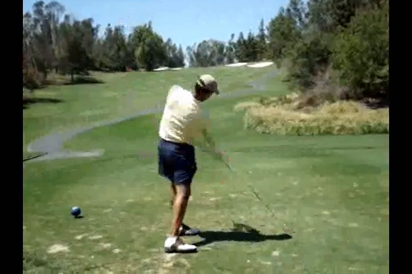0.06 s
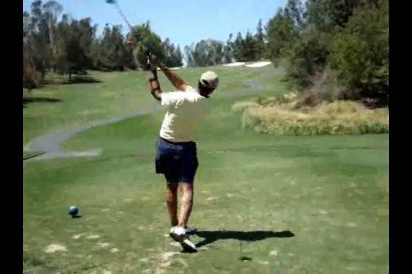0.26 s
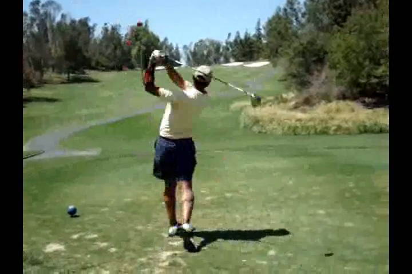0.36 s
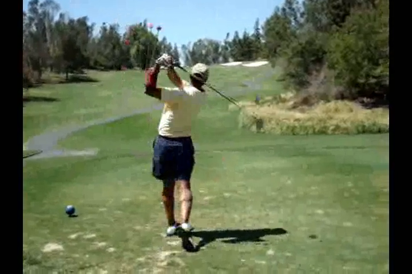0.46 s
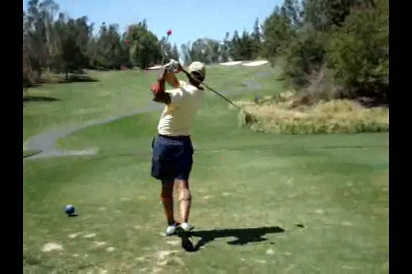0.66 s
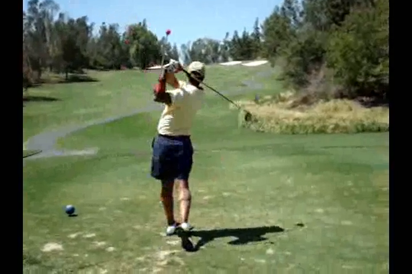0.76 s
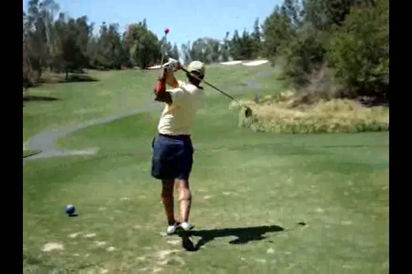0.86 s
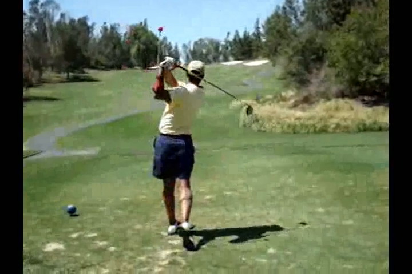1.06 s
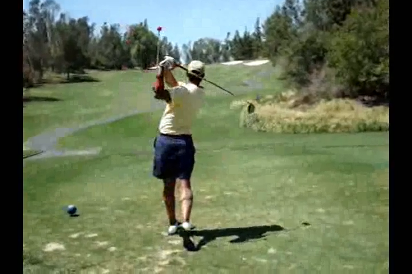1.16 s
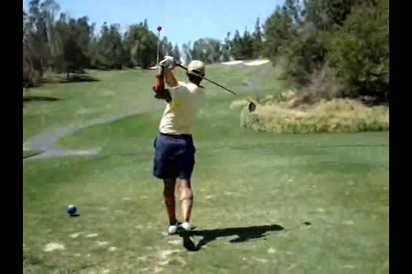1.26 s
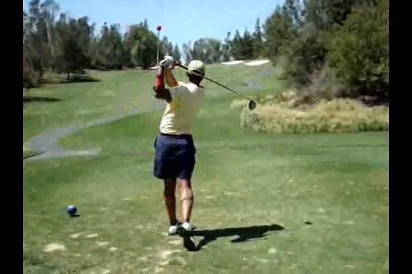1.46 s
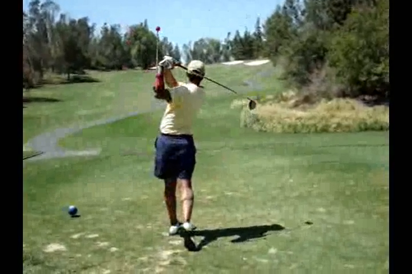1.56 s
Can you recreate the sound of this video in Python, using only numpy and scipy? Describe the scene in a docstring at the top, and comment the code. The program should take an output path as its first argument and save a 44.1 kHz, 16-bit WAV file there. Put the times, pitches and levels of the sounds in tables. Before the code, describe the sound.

One hard golf drive on an open course: a brief swish rises into a bright clanging crack, followed by quick, duller echoes and a dying wash from trees, then low faint steps on turf and near quiet.

```python
"""A golf club drives a ball off the tee: a pulse and short ball modes make the crack, and the hollow
metal head rings briefly as decaying sines over a dense noise clang.
A swish of shaped air noise with a wavering shed tone leads up to it. The trees return the strike as
filtered delays and dying noise washes. The feet press the turf in soft, low, decaying thuds,
over a faint steady outdoor hush of coloured noise."""
import sys
import numpy as np
from scipy import signal
from scipy.fft import rfft, irfft
from scipy.io import wavfile

SR = 44100
rng = np.random.default_rng(int(sys.argv[2]) if len(sys.argv) > 2 else 0)


def unload_audio(sound):
    """Save the sound as a 16-bit wav file, at the path given as the first command line argument."""
    columns = np.transpose(np.atleast_2d(sound))
    # keep every value between -1 and 1, then stretch to whole-number steps
    steps = np.round(np.clip(columns, -1, 1) * 32767)
    wavfile.write(sys.argv[1], SR, steps.astype(np.int16))


N = 70560
TIME = np.arange(N) / SR
IMPACT_S = .2713
CUTOFF_HZ = 10100  # upper band limit of the noises and of the microphone


def from_db(db):
    """Logarithmic level: decibels to amplitude gain."""
    return 10 ** (np.asarray(db) / 20)


def rms_one(x):
    """Power normalization: scale to rms 1."""
    return x / np.sqrt(np.mean(x ** 2) + 1e-20)


def since(start_s):
    """Elapsed time: seconds since a moment, zero before it."""
    return np.maximum(TIME - start_s, 0)


def fade(age, t60):
    """Exponential damping: a fall of 60 dB in t60 seconds."""
    return np.exp(-np.log(1000) * age / t60)


def ring(age, hz, t60):
    """Modal vibration: one struck mode is a damped sine."""
    return np.sin(2 * np.pi * hz * age) * fade(age, t60)


def noise(spectrum):
    """Spectral shaping: random noise weighted by a frequency-level curve, at rms 1."""
    hz, db = np.transpose(spectrum)
    bins = np.maximum(np.fft.rfftfreq(N, 1 / SR), 1)
    curve_db = np.interp(np.log(bins), np.log(hz), db)
    gain = from_db(curve_db) * (bins < CUTOFF_HZ)
    return rms_one(irfft(rfft(rng.standard_normal(N)) * gain, N))


def low_pass(x, hz):
    """Second-order filtering: a gentle treble cut."""
    return signal.sosfilt(signal.butter(2, min(hz, SR / 2 - 1), fs=SR, output="sos"), x)


def high_pass(x, hz):
    """Second-order filtering: a gentle bass cut."""
    return signal.sosfilt(signal.butter(2, hz, "high", fs=SR, output="sos"), x)


HUSH_DB = -47
# Colour of the outdoor hush: frequency_hz [Hz], relative_level_db [dB per Hz]
HUSH_COLOUR = [(15, -66), (25, -32), (104, -10), (233, -0.5), (314, -3.5), (348, -5.5), (494, -2.5),
               (634, -4), (737, -4.5), (795, -5), (2110, -13), (7780, -24), (10000, -28), (13000, -65),
               (22000, -120)]


def outdoor_hush():
    """Stationary random noise: the faint outdoor background keeps one level and colour."""
    return from_db(HUSH_DB) * noise(HUSH_COLOUR)


THUD_RISE_S, THUD_T60_S = 0.0022, 0.081
# Presses of the feet on the turf: full_s [s], level_db [dB, before doubling], pitch_hz [Hz]
THUDS = [(0.027, -46, 97), (.630, -45.5, 134), (.651, -40.5, 117), (.659, -39, 227), (0.718, -51.5, 110)]


def feet():
    """Damped low resonance: each soft push of a shoe on the turf sets off one decaying mode."""
    total = 0
    for full_s, level_db, pitch_hz in THUDS:
        age = since(full_s - THUD_RISE_S)
        rise = np.minimum(age / THUD_RISE_S, 1)
        total = total + from_db(level_db) * rise * 2 * ring(age, pitch_hz, THUD_T60_S)
    return total


FLUTTER_DB, FLUTTER_HZ = 0.9, 70  # rms level wander, and its bandwidth
# Waves of scatter: delay_s [s after impact], rise_s [s], level_db [dB], t60_s [s]
# from the far tree line, the nearer trees, and the bushes beside the tee
FAR_TREES = [(.1, 0.055, -40.5, 1.56), (.2, 0.018, -40, 0.23), (.243, 0.0024, -36, 0.042)]
NEAR_TREES = [(.100, 0.014, -25.5, 0.45)]
BUSHES = [(.068, 0.013, -23.5, 0.094)]
# Colours of the scatter, the head's resonances smeared into humps:
# frequency_hz [Hz], relative_level_db [dB per Hz]
FAR_COLOUR = [(60, -24), (400, -8), (1000, 10), (1800, 2), (2800, -5), (3700, 3), (4600, -1), (5700, 4),
              (6200, -4), (7800, -5.5), (10000, -20)]
NEAR_COLOUR = [(60, -37), (250, -17), (600, -4), (1050, 4.5), (1800, 0.5), (2800, -8), (3500, 4.5),
               (4200, -5), (4850, 5), (5300, 4), (6400, 1), (7000, 6), (8000, 4.5), (9200, -1), (10000, -7)]
BUSH_COLOUR = [(60, -33), (400, -5), (1000, -8), (1800, -8), (2800, -9), (3500, -4), (4300, -5),
               (4850, -3.5), (6000, -6), (7000, 7), (8000, -0.5), (10000, -6)]


def trees(stands, colour):
    """Diffuse scattering: countless small reflections add in power to a clumpy, dying noise wash."""
    power = 0
    for delay_s, rise_s, level_db, t60_s in stands:
        start_s = IMPACT_S + delay_s
        rise = np.minimum(since(start_s) / rise_s, 1)
        decay = fade(since(start_s + rise_s), t60_s)
        power = power + (from_db(level_db) * rise * decay) ** 2
    flutter = rms_one(low_pass(rng.standard_normal(N), FLUTTER_HZ))
    clumps = from_db(FLUTTER_DB * flutter)
    return noise(colour) * np.sqrt(power) * clumps


ECHO_LOW_CUT_HZ = 230
# Single echoes of the strike: delay_s [s], level_db [dB], treble_cut_hz [Hz]
ECHOES = [(0.0808, -17.5, 9500), (0.2483, -17.5, 1800), (0.332, -21, 1100)]


def echoes(strike):
    """Discrete reflection: delayed copies return thin in the bass and duller with distance."""
    thin = high_pass(strike, ECHO_LOW_CUT_HZ)
    total = 0
    for delay_s, level_db, treble_cut_hz in ECHOES:
        delayed = np.concatenate([np.zeros(int(delay_s * SR)), thin])[:N]
        total = total + from_db(level_db) * low_pass(delayed, treble_cut_hz)
    return total


# The air noise lies SWISH_RISE_DB below full at SWISH_START_S, and lower still before that
SWISH_START_S, SWISH_FULL_S, SWISH_RISE_DB = .17, 0.23, 20
SWISH_DB, SWISH_RELEASE_DB_PER_S = -35, 499
SHED_WIDTH_HZ = 72  # low-pass limit of the random modulation
# Colour of the rushing air: frequency_hz [Hz], relative_level_db [dB per Hz]
SWISH_AIR = [(60, -24), (200, -8.5), (400, -2), (1200, -2), (2000, -9.5), (3500, -13), (6000, -21.5),
             (10000, -27.5)]
# Path of the tone shed by the shaft: time_s [s], pitch_hz [Hz], level_db [dB]
SHED_TONE = [(0.189, 340, -63), (.219, 501.6, -39), (.238, 739, -33), (0.254, 599, -31),
             (0.272, 662, -29.5), (.285, 620, -71)]


def swish():
    """Aerodynamic noise: turbulence swells with club speed and shed eddies make a breathy tone."""
    slack = np.maximum(SWISH_FULL_S - TIME, 0) / (SWISH_FULL_S - SWISH_START_S)
    release_db = SWISH_RELEASE_DB_PER_S * since(IMPACT_S)
    air_db = SWISH_DB - SWISH_RISE_DB * slack ** 2 - release_db
    air = from_db(air_db) * noise(SWISH_AIR)

    time_s, pitch_hz, level_db = np.transpose(SHED_TONE)
    phase = 2 * np.pi * np.cumsum(np.interp(TIME, time_s, pitch_hz)) / SR
    # Two slow random signals in quadrature broaden the tone into a narrow band
    eddies = low_pass(rng.standard_normal((2, N)), SHED_WIDTH_HZ)
    tone = rms_one(eddies[0] * np.cos(phase) + eddies[1] * np.sin(phase))
    tone_gain = from_db(np.interp(TIME, time_s, level_db))
    sounding = (TIME > time_s[0]) * (TIME < time_s[-1])
    return air + tone * tone_gain * sounding


HEAD_DB = 1.8  # added to every mode level
CLANG_DB, CLANG_T60_S = -19.5, 0.54
RING_ATTACK_S, RING_HOLD_S, RING_RELEASE_DB_PER_S = 0.0011, 0.035, 604
# Clear modes of the hollow head: pitch_hz [Hz], level_db [dB, before HEAD_DB],
# t60_s [s, before the common release]
HEAD_MODES = [(3311, -33, .3), (3448, -27, .17), (4513, -32, .3), (4778, -24, .2), (4834, -28, .5),
              (4926, -31, .25), (5732, -29, .7), (5803, -27, .9), (6417, -32, .2), (6978, -20.5, .22),
              (7036, -22.5, .35), (7256, -29, .5), (7316, -31, .3), (8021, -22, .06), (8592, -33, .22),
              (8925, -31, .25)]
# Colour of the head's many weak, crowded modes: frequency_hz [Hz], relative_level_db [dB per Hz]
CLANG_COLOUR = [(50, -15), (150, -16.5), (400, -8), (1000, -1.5), (1900, -2.5), (2600, -9), (3400, 4.5),
                (4000, -3), (4750, 6), (5300, 0), (5800, 6), (6300, -2), (7100, 5), (7600, 3.5), (9000, 1),
                (10000, -0.5)]


def club_head():
    """Modal superposition: clear modes ring over a dense clang, then a steep release ends both."""
    age = since(IMPACT_S)
    modes = 0
    for k, (pitch_hz, level_db, t60_s) in enumerate(HEAD_MODES):
        sign = (-1) ** k
        modes = modes + sign * from_db(HEAD_DB + level_db) * ring(age, pitch_hz, t60_s)
    clang = from_db(CLANG_DB) * noise(CLANG_COLOUR) * fade(age, CLANG_T60_S)
    attack = np.minimum(age / RING_ATTACK_S, 1)
    release = from_db(-RING_RELEASE_DB_PER_S * since(IMPACT_S + RING_HOLD_S))
    return (modes + clang) * attack * release


CONTACT_S, CONTACT_DB, BALL_DB = 0.00028, -2, -17
# Modes of the ball: pitch_hz [Hz], level_db [dB, relative to BALL_DB], t60_s [s]
BALL_MODES = [(710, 0.5, 0.026), (1220, 1.5, 0.018), (1510, -5, 0.0091), (1890, -3.5, 0.007),
              (2560, -3.5, .014)]


def crack():
    """Impulsive excitation: contact makes one half-sine pulse, then the ball rings as it springs away."""
    pulse = -np.sin(np.pi * np.minimum(since(IMPACT_S) / CONTACT_S, 1))
    age = since(IMPACT_S + CONTACT_S)
    ball = sum(from_db(level_db) * ring(age, pitch_hz, t60_s) for pitch_hz, level_db, t60_s in BALL_MODES)
    return from_db(CONTACT_DB) * pulse + from_db(BALL_DB) * ball


def scene():
    """Linear superposition: hush, feet, returns, swish and strike add."""
    strike = crack() + club_head()
    scatter = trees(FAR_TREES, FAR_COLOUR) + trees(NEAR_TREES, NEAR_COLOUR) + trees(BUSHES, BUSH_COLOUR)
    returns = scatter + echoes(strike)
    return (outdoor_hush() + feet() + returns + swish() + strike)[None]


MIC_LOW_CUT_HZ = 50


def record(dry):
    """Band limiting: the microphone loses the deep bass and the top is cut steeply."""
    top_cut = signal.ellip(10, .1, 70, CUTOFF_HZ, fs=SR, output="sos")  # 0.1 dB ripple, 70 dB stop
    return signal.sosfilt(top_cut, high_pass(dry, MIC_LOW_CUT_HZ))


dry = scene()
out = record(dry)
unload_audio(out)
```